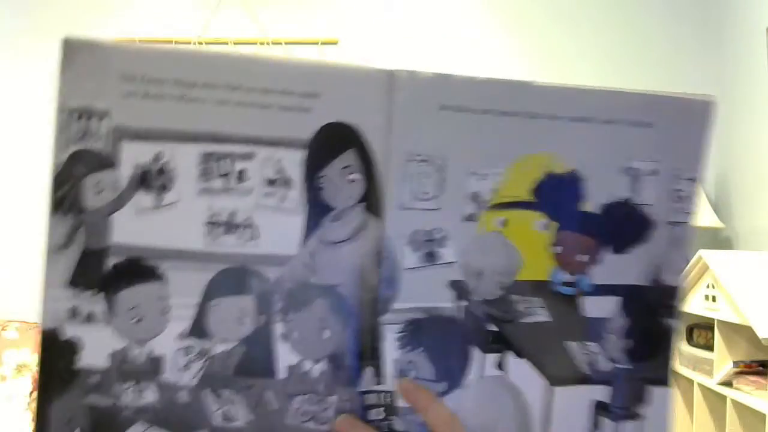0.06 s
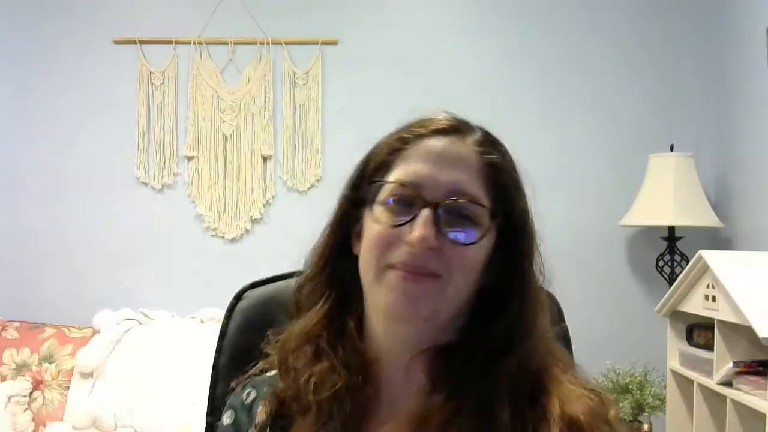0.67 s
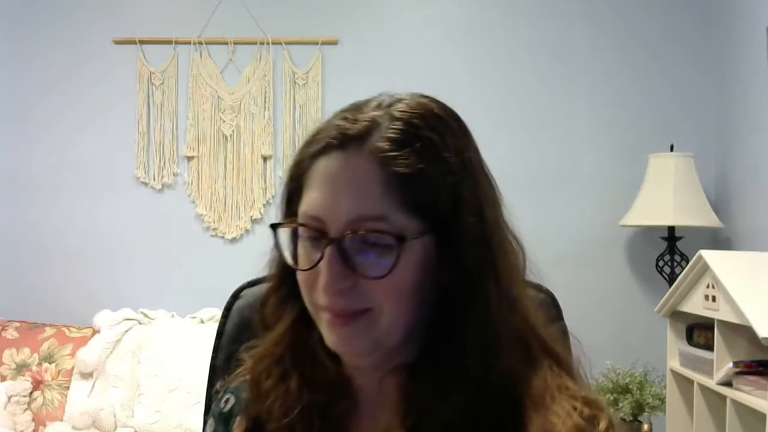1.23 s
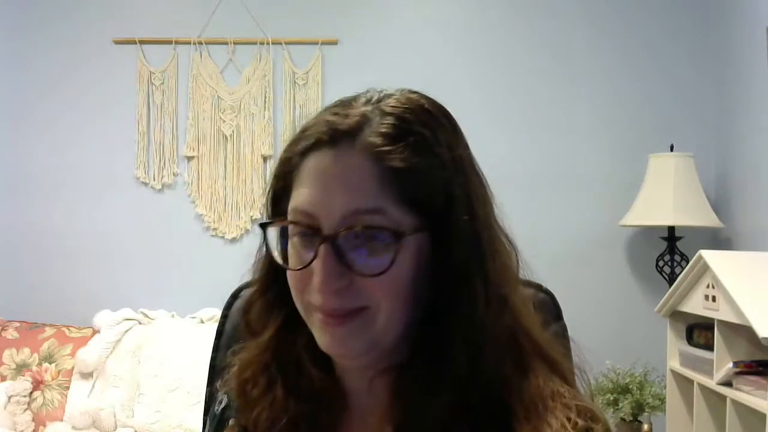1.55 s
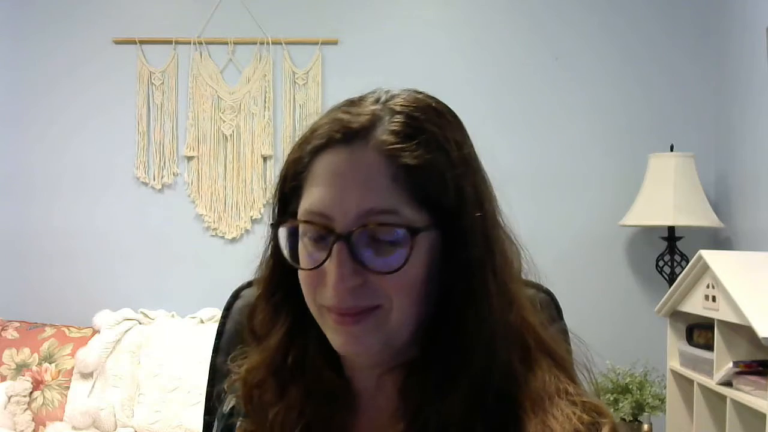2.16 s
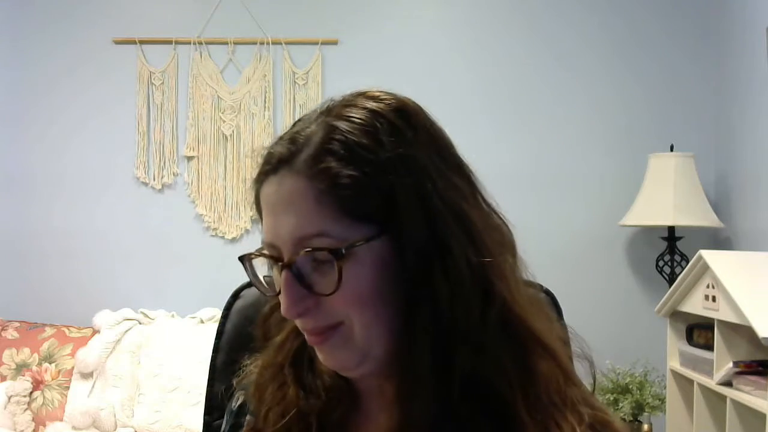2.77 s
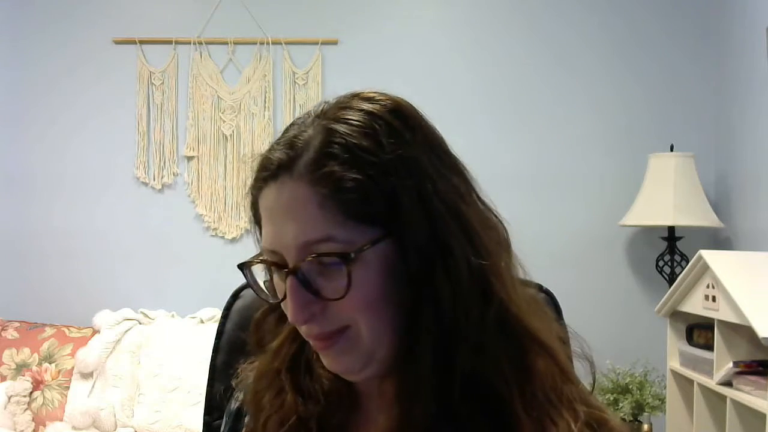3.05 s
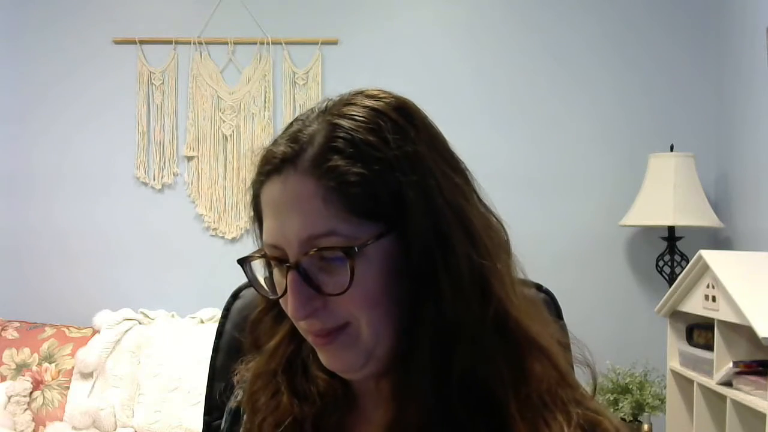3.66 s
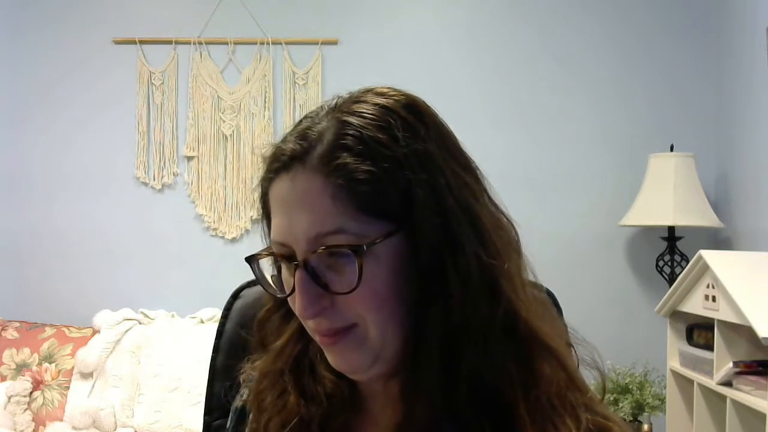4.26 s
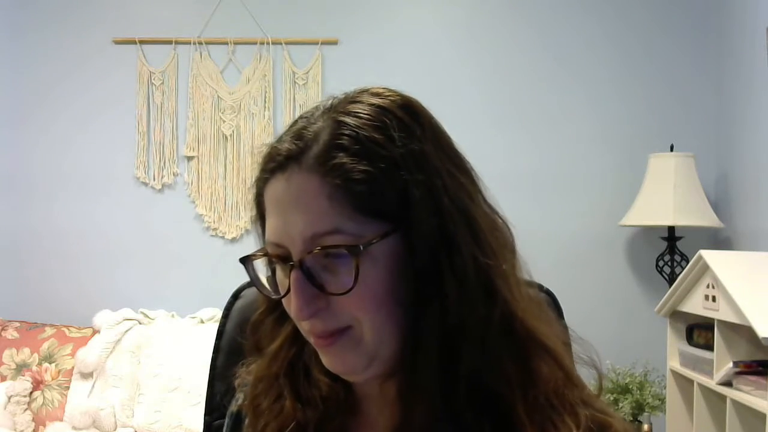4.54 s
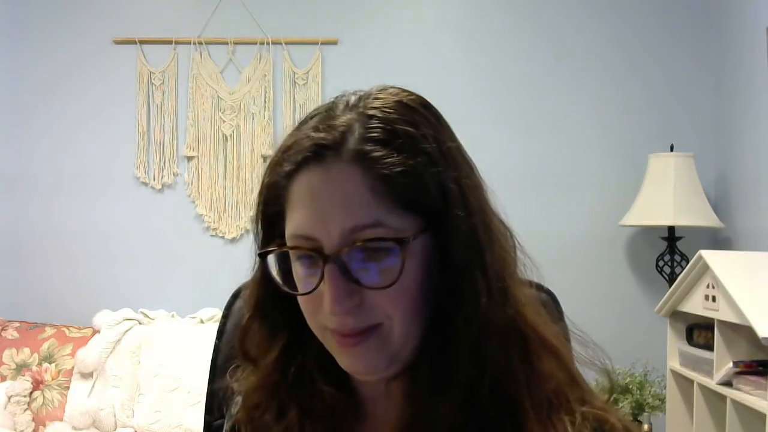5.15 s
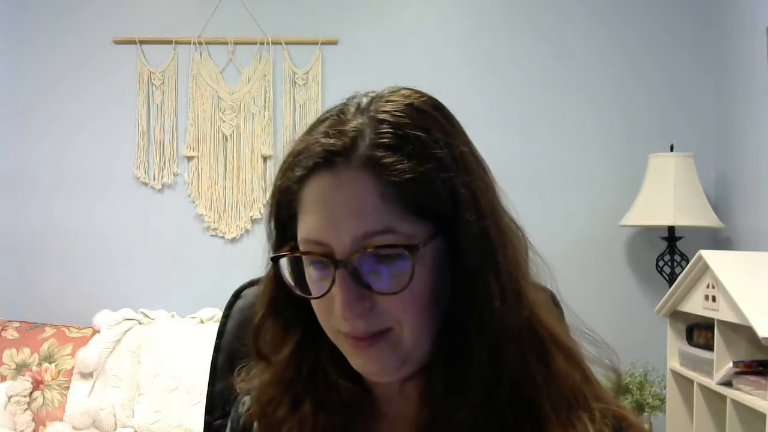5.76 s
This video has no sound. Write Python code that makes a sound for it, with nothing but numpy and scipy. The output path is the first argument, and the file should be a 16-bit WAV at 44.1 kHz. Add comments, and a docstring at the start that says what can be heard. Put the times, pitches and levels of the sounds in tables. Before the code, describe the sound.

Stiff pages of a large book are turned close by, with sliding rustles, crisp snaps and soft knocks over a faint hum.

```python
"""A large picture book is lowered and its stiff pages are turned, close to a desk microphone in a small room.
A faint hum and a fan sound throughout. In the first second and a half the book settles with soft thumps,
fingers knock on the cover and paper rustles. After a pause, sheets slide over each other in dense tiny
slips and snap as they buckle, loudest from 2.5 to 4 s, while the swinging pages push puffs of air.
Last, the pages are smoothed down amid more knocks and a few hollow taps as the grip shifts."""
import sys
import numpy as np
from scipy import signal
from scipy.fft import rfft, irfft
from scipy.io import wavfile
from scipy.ndimage import uniform_filter1d

SR = 44100
rng = np.random.default_rng(int(sys.argv[2]) if len(sys.argv) > 2 else 0)


def int16_out(signal):
    """Quantize to a 16-bit WAV file."""
    q = np.round(np.clip(np.atleast_2d(signal).T, -1, 1) * 32767)
    wavfile.write(sys.argv[1], SR, q.astype(np.int16))


N = 255542
TIME = np.arange(N) / SR


def amp(db):
    """Decibels to amplitude ratio."""
    return 10 ** (np.asarray(db) / 20)


def unit(x):
    """Normalise to an rms of one."""
    return x / np.sqrt(np.mean(x ** 2))


def with_energy(x, ms, db):
    """Energy is power times duration: give x that of a level db held for ms."""
    return x * amp(db) * np.sqrt(ms * SR / 1000 / np.sum(x ** 2))


def add(track, start_s, sound):
    """Superpose a sound on the track."""
    start = int(start_s * SR)
    track[start:start + len(sound)] += sound[:N - start]


def band(x, low_hz, high_hz):
    """Butterworth band-pass filter."""
    return signal.sosfilt(signal.butter(3, [low_hz, high_hz], "band", fs=SR, output="sos"), x)


def colour(x, spectrum, size=2048):
    """Minimum-phase filter through the given (Hz, dB) points."""
    hz, db = np.transpose(spectrum)
    grid_hz = np.maximum(np.arange(size // 2 + 1) * SR / size, 1)
    gain = amp(np.interp(np.log(grid_hz), np.log(hz), db))
    cepstrum = irfft(np.log(gain))
    cepstrum[1:size // 2] *= 2
    cepstrum[size // 2 + 1:] = 0
    impulse_response = irfft(np.exp(rfft(cepstrum)))
    return signal.fftconvolve(x, impulse_response)[:len(x)]


def moving_high_pass(x, cutoff_hz, db_per_octave=50, floor_db=-26):
    """Time-varying filter: attenuate what lies below a moving cutoff."""
    hz, t, frames = signal.stft(x, SR, nperseg=256)
    octaves_below = np.log2(np.interp(t, TIME, cutoff_hz) / np.maximum(hz, 1)[:, None])
    gain = amp(np.clip(-db_per_octave * octaves_below, floor_db, 0))
    return signal.istft(frames * gain, SR)[1][:N]


def wander(rate_hz):
    """Smooth random modulation with a spread near one."""
    hold = int(SR / rate_hz)
    steps = np.repeat(rng.standard_normal(N // hold + 1), hold)
    return uniform_filter1d(steps, hold)[:N]


def burst(ms, rise_fraction, tail_db, tail_ms, size=4096):
    """Transient excitation: a run of tiny uneven cracks with a weak exponential tail."""
    t_ms = np.arange(size) / SR * 1000
    attack = 1 - np.exp(-t_ms / (rise_fraction * ms))
    decay = np.exp(-(t_ms / ms) ** 2) + amp(tail_db) * np.exp(-t_ms / tail_ms)
    return attack * decay * rng.standard_normal(size) * amp(3 * rng.standard_normal(size))


# Partials of the hum. Each row: frequency in Hz, mean level in dB.
HUM_PARTIALS = [(119, -88.5), (240, -79), (357, -81), (472, -82.5), (585, -82.5)]
# Spectrum of the fan and room air. Each row: frequency in Hz, relative level in dB.
FAN_SPECTRUM = [(30, -30), (60, -15), (120, -3.5), (300, -8.5), (400, -0.5), (560, -0.5), (750, -6.5),
                (1000, -14.5), (1700, -21.5), (3200, -24), (6300, -22), (9000, -29), (16000, -32)]
def hum_and_fan(waver_db=3.0, fan_db=-71):
    """Tones over broadband noise: a hum, modulated in amplitude and phase, and a steady fan."""
    hum = 0
    for hz, db in HUM_PARTIALS:
        peak = np.sqrt(2) * amp(db + waver_db * wander(8.8))
        hum += peak * np.sin(2 * np.pi * hz * TIME + 0.5 * wander(20))
    fan = unit(colour(rng.standard_normal(N), FAN_SPECTRUM))
    return hum + fan * amp(fan_db + 0.61 * wander(2.6))


def room(x, wet_db=-7.5, t60_s=0.11, gap_s=0.0042):
    """Reverberation: desk and walls return a short tail, weak in the bass and the top treble."""
    t = np.arange(20000) / SR
    onset = np.clip(t / gap_s - 1, 0, 1)
    tail = rng.standard_normal(len(t)) * amp(-60 * t / t60_s) * onset
    tail = colour(tail / np.sqrt(np.sum(tail ** 2)), [(150, -6), (500, -0.5), (7000, -3), (14000, -10)])
    return x + amp(wet_db) * signal.fftconvolve(x, tail)[:N]


# Soft bumps of the book and puffs of air. Each row: start in seconds, relative level in dB, pitch in Hz.
BOOK_THUMPS = [(0.442, -53.5, 126), (.718, -46, 327), (.971, -46.5, 147), (1.043, -40, 125),
               (1.252, -35, 106), (1.303, -47, 144.3), (1.351, -40.5, 113.4), (1.381, -50, 447),
               (1.386, -50, 123), (2.53, -51, 176), (2.829, -50, 109), (3.141, -52.5, 135),
               (3.235, -55.5, 286), (3.485, -45, 134), (3.543, -48.5, 187), (3.587, -49.5, 106),
               (3.956, -48.5, 126), (4.275, -48.5, 128.1), (4.522, -38, 159), (4.561, -47.5, 175),
               (4.706, -45, 133), (5.63, -50.5, 113.7)]
def book_thumps(rise_s=0.0078, decay_s=0.015, rumble=1.4, gain_db=-3):
    """Damped oscillation: the book sways for a few cycles, with a rumble of displaced air."""
    out = np.zeros(N)
    t = np.arange(8192) / SR
    envelope = (1 - np.exp(-t / rise_s)) ** 2 * np.exp(-t / decay_s)
    for start, db, hz in BOOK_THUMPS:
        sway = np.sin(2 * np.pi * hz * t)
        air = unit(band(rng.standard_normal(len(t)), .7 * hz, 1.6 * hz))
        add(out, start, with_energy(envelope * (sway + rumble * air), ms=30, db=db + gain_db))
    return out


def resonate(force, modes):
    """Modal superposition: each mode answers the force as a damped resonator."""
    return sum(amp(db) * signal.lfilter(*signal.iirpeak(hz, hz / width, fs=SR), force)
               for hz, width, db in modes)


# Modes of the cover. Each row: frequency in Hz, bandwidth in Hz, gain in dB.
COVER_MODES = [(606, 280, 0.5), (620, 59, 1.5), (807, 128, 9), (1055, 320, 11.5), (1270, 130, 0.5),
               (1740, 84, 0), (1867, 250, -0.5), (2460, 240, -27)]
# Fingers and pages meet the cover.
# Each row: start in seconds, contact time in ms, level in dB, upper limit of the excitation in Hz.
COVER_KNOCKS = [(.711, 5, -44.5, 1500), (.722, 5.6, -36, 3600), (1.015, 12, -36.5, 1080),
                (1.034, 18, -34.5, 1260), (1.255, 6.4, -40.5, 1310), (1.314, 2.9, -32.5, 2230),
                (1.385, 6.5, -51, 895), (4.05, 12.6, -39.5, 1490), (4.117, 4.4, -42.5, 2190),
                (4.433, 9.5, -47, 2110), (4.707, 17, -37.5, 2300), (4.724, 11.7, -33, 2060),
                (5.25, 27, -48.5, 2500), (5.282, 8.1, -39.5, 2190), (5.309, 4.3, -45.5, 2400),
                (5.345, 6.9, -47, 2180), (5.627, 3.9, -41.5, 1793)]
def cover_knocks():
    """Impact excitation: the softer the contact, the lower the cover modes it reaches."""
    out = np.zeros(N)
    for start, ms, db, top_hz in COVER_KNOCKS:
        force = band(burst(ms, rise_fraction=.24, tail_db=-18, tail_ms=15), top_hz / 4, top_hz)
        add(out, start, with_energy(resonate(force, COVER_MODES), ms, db))
    return out


# Modes of a hollow tap. Each row: frequency in Hz, bandwidth in Hz, gain in dB.
HOLLOW_MODES = [(1005, 75, 2.5), (1944, 91, 1.5), (2429, 220, -13)]
# Taps of the shifting grip. Each row: start in seconds, contact time in ms, level in dB.
GRIP_TAPS = [(4.517, 4.6, -45), (4.908, 3.7, -45), (4.914, 4.6, -45), (4.926, 3, -59)]
def grip_taps():
    """Resonance: light contacts ring a few narrow modes, which sound hollow."""
    out = np.zeros(N)
    for start, ms, db in GRIP_TAPS:
        force = band(burst(ms, rise_fraction=.2, tail_db=-20, tail_ms=7), 800, 2700)
        add(out, start, with_energy(resonate(force, HOLLOW_MODES), ms, db))
    return out


# Airy sizzle of a page's edge. Each row: frequency in Hz, relative level in dB.
SIZZLE_SPECTRUM = [(5000, -27), (8500, 4.5), (10000, 8), (13000, -8), (15000, -13.5), (16500, -28)]
# A page grazes its neighbour. Each row: start in seconds, duration in ms, level in dB.
EDGE_GRAZES = [(.966, 43, -58), (1.028, 44, -47.5), (1.574, 32, -52), (3.681, 4.1, -26.5), (3.7, 30, -54),
               (4.645, 30, -65)]
def edge_grazes():
    """Friction of cut edges: they catch on each other in a run of very fine cracks."""
    out = np.zeros(N)
    for start, ms, db in EDGE_GRAZES:
        cracks = burst(ms, rise_fraction=.074, tail_db=-19.5, tail_ms=18, size=16384)
        add(out, start, with_energy(colour(cracks, SIZZLE_SPECTRUM), ms, db))
    return out


# Spectra of a snap's crack and of the sheet's body. Each row: frequency in Hz, relative level in dB.
CRACK_SPECTRUM = [(2000, -22), (3300, -10.5), (4400, -5), (5500, -2), (6500, 2.5), (7300, -3.5),
                  (8300, -11), (10000, -31), (15000, -65)]
BODY_SPECTRUM = [(40, -29.5), (110, -6.5), (350, 0.5), (800, -5), (1400, 1), (1600, 0.5), (1850, 1.5),
                 (2200, -2.5), (2600, 3), (3400, -5.5), (4600, -4), (12000, -61)]
# A buckled span rings at its lowest mode and about an octave above, and radiates little below.
# Each row: multiple of the lowest mode, gain in dB.
SPAN_RESPONSE = [(.3, -12), (.68, -15.5), (.95, 3.5), (1.1, 1), (1.4, -3.5), (2, 0.5), (2.4, -1.5)]
# A sheet buckles or its edge flicks.
# Each row: start in seconds, duration in ms, crack level in dB, body level in dB, lowest mode in Hz.
PAGE_SNAPS = [(.211, 8.1, -60, -100, 900), (0.447, 15, -54.5, -58.5, 800), (.594, 8.3, -48, -51.5, 604),
              (.656, 2.2, -47.5, -80, 2000), (.721, 10, -58.5, -43, 500), (.779, 1.54, -32, -65, 1770),
              (0.965, 7.2, -49.5, -44.5, 594), (0.976, 10.5, -39, -37.5, 560), (1.024, 50, -32, -40.5, 523),
              (1.051, 4.8, -30.5, -26.5, 545), (1.061, 1.5, -22, -31.5, 700),
              (1.119, 3.3, -39, -36.5, 1090), (1.313, 7.3, -50, -35.5, 900),
              (1.378, 5.5, -33.5, -29.5, 970), (1.577, 6.2, -34, -32, 940), (1.5912, 5.8, -25.5, -24, 965),
              (1.619, 1.3, -30, -55.5, 2010), (2.426, 14.8, -32.5, -38, 606), (2.53, 4.7, -14.5, -21, 554),
              (2.736, 18, -50.5, -65, 1300), (3.051, 11, -46, -50.5, 980), (3.061, 9.6, -41, -43.5, 830),
              (3.135, 5.2, -37.5, -45.5, 680), (3.323, 6.1, -60, -47, 890), (3.495, 0.64, -22.5, -22, 695),
              (3.585, 7.7, -45, -42.5, 590), (3.681, 6.1, -11.5, -17.5, 504), (3.959, 2.4, -15.5, -15, 575),
              (3.9762, 1.4, -23, -38, 900), (4.2659, 4.1, -22, -21.5, 630), (4.284, 8.6, -40.5, -28.5, 615),
              (4.5651, 3.3, -21, -17.5, 626), (4.708, 12.7, -46, -62, 900), (5.046, 12, -53, -90, 895),
              (5.246, 5.7, -50.5, -46.5, 800)]
def page_snaps(sizzle_offset_db=-21.5, sizzle_db_per_db=1.3):
    """Buckling releases elastic energy: a sharp crack, the sound of the whole sheet and an edge sizzle."""
    out = np.zeros(N)
    bend_hz = np.geomspace(1100, 9000, 20)
    for start, ms, crack_db, body_db, lowest_hz in PAGE_SNAPS:
        span = [(multiple * lowest_hz, db) for multiple, db in SPAN_RESPONSE]
        bend_db = 2 * rng.standard_normal(len(bend_hz))  # each bend has resonances of its own
        bend_db[0] = 0  # the slow motion of the whole sheet stays the same
        bend = np.column_stack([bend_hz, bend_db])
        sizzle_db = sizzle_offset_db + sizzle_db_per_db * crack_db
        parts = [(CRACK_SPECTRUM, ms, crack_db), (BODY_SPECTRUM, ms, body_db),
                 (SIZZLE_SPECTRUM, ms / 2, sizzle_db)]  # the sizzle dies first
        for spectrum, burst_ms, db in parts:
            cracks = burst(burst_ms, rise_fraction=.09, tail_db=-19.5, tail_ms=17)
            ringing = colour(colour(cracks, bend), span)
            add(out, start, with_energy(colour(ringing, spectrum), ms, db))
    return out


# Paper slides over paper or under a hand. Each row: start in seconds, duration in seconds,
# relative hiss level in dB, relative sheet level in dB, sheet resonance in Hz,
# swell from start to end in dB, lower cutoff of the hiss at mid-stroke in Hz.
PAGE_STROKES = [(0.44, .072, -61, -83, 2480, 5, 3300), (.588, .03, -52, -66, 1194, -9.5, 3305),
                (.65, .15, -64, -71, 1703, 4.5, 4800), (0.81, 0.055, -55.5, -53, 1439, 3, 3790),
                (0.869, 0.1, -62.5, -67.5, 1143, -11.5, 5160), (0.959, .065, -42, -44, 1592, -4, 3380),
                (1.013, 0.092, -38, -42.5, 2318, -7, 3030), (1.089, .18, -45, -48, 2699, -5, 3194),
                (1.127, .052, -59, -35.5, 3308, 7, 2986), (1.232, .18, -47.5, -46.5, 2330, .5, 2998),
                (1.348, 0.027, -43.5, -38.5, 2000, 8, 3000), (1.41, .135, -46.5, -38, 2120, -3.5, 3500),
                (1.551, .038, -45.5, -40, 2530, -1.5, 3500), (1.663, 0.49, -79.5, -90, 2820, -4, 4000),
                (2.319, .21, -48, -57, 2389, 7.5, 3575), (2.508, .085, -39.5, -47, 2705, -7, 2700),
                (2.585, .10, -50.5, -69, 3102, -8.5, 2696), (2.724, .1, -46.5, -58, 1698, 9, 3297),
                (2.905, 0.21, -49.5, -89.5, 3175, 3, 4110), (3.075, .26, -52, -59.5, 2005, -1, 3005),
                (3.253, 0.035, -59.5, -51, 3210, -4, 2990), (3.329, .085, -51.5, -69, 1690, -4, 4420),
                (3.424, .065, -48, -62.5, 1905, 19.5, 4355), (3.489, 0.38, -44.5, -57, 1900, 3.5, 3677),
                (3.668, 0.16, -37.5, -40, 2283, -17.5, 3014), (3.884, 0.076, -56.5, -55, 1196, 9, 4963),
                (3.948, 0.17, -39, -46, 1786, 1.5, 3440), (4.124, 0.097, -44.5, -78.5, 2788, 2, 5000),
                (4.18, .11, -41.5, -48.5, 1972, -0.5, 4200), (4.34, .22, -63, -66, 1409, 6, 4500),
                (4.388, 0.037, -48, -69.5, 1293, 2.5, 3612), (4.545, .09, -41.5, -43, 1904, -13, 2870),
                (4.634, 0.056, -64, -45.5, 1182, -0.5, 2916), (4.723, .085, -68.5, -59, 1002, -8.5, 4510),
                (4.801, .42, -73, -79.5, 2203, -5, 5200), (5.239, .22, -64.5, -68, 1299, -17, 4200),
                (5.443, .12, -54, -63.5, 2697, 20.5, 3830)]
def stroke_envelopes(attack_s=0.027, hiss_fall_db_per_s=482.5, sheet_fall_db_per_s=620.5, lift_octaves=.23):
    """Incoherent sources add in power: return hiss and sheet gains, power-weighted resonance and cutoff."""
    hiss_sum = sheet_sum = resonance_sum = cutoff_sum = 0
    for start, duration, hiss_db, sheet_db, resonance_hz, swell_db, cutoff_hz in PAGE_STROKES:
        t = TIME - start
        from_middle = np.clip(t / duration, 0, 1) - .5
        envelope = np.clip(t / attack_s, 0, 1) ** 2 * amp(swell_db * from_middle)
        since_end = np.clip(t - duration, 0, 1)
        hiss_power = (envelope * amp(hiss_db - hiss_fall_db_per_s * since_end)) ** 2 + 1e-18
        sheet_power = (envelope * amp(sheet_db - sheet_fall_db_per_s * since_end)) ** 2 + 1e-18
        lift = 2 ** (lift_octaves * (2 * from_middle) ** 2)  # the hiss thins at a stroke's slow ends
        hiss_sum += hiss_power
        sheet_sum += sheet_power
        cutoff_sum += hiss_power * cutoff_hz * lift
        resonance_sum += sheet_power * resonance_hz
    return np.sqrt(hiss_sum), np.sqrt(sheet_sum), resonance_sum / sheet_sum, cutoff_sum / hiss_sum


def fibre_slips(per_second=2200, scatter_db=1.5, smooth_rub=.5):
    """Stick-slip friction: fibres catch and let go in tiny uneven clicks over a smooth rub."""
    slipping = rng.random(N) < per_second / SR
    sizes = amp(scatter_db * np.minimum(rng.exponential(size=N), 5))
    clicks = unit(slipping * sizes * rng.choice([-1, 1], N))
    return unit(clicks + smooth_rub * rng.standard_normal(N))


def sliding_pages(octaves_below=.78, octaves_above=.86, pressure_db=1.3, flutter_db=2.0, patchy_db=3.5):
    """Forced vibration: slips hiss at the surface and shake the sheet, whose resonance moves as it bends."""
    hiss_gain, sheet_gain, resonance_hz, cutoff_hz = stroke_envelopes()
    resonance_hz *= 2 ** (.15 * wander(22))
    pressing_db = pressure_db * wander(26)
    friction = fibre_slips() * amp(pressing_db + flutter_db * wander(170))
    band_edges = np.geomspace(300, 7600, 15)
    sheet = power = 0
    for low, high in zip(band_edges, band_edges[1:]):
        octaves_off = np.log2(np.sqrt(low * high) / resonance_hz)
        width = np.where(octaves_off < 0, octaves_below, octaves_above)
        weight = np.exp(-.5 * (octaves_off / width) ** 2)
        sheet += unit(band(friction, low, high)) * weight * amp(patchy_db * wander(27))
        power += weight ** 2
    sheet = unit(sheet / np.sqrt(power))
    return surface_hiss(friction, cutoff_hz) * hiss_gain * amp(-0.5) + sheet * sheet_gain * amp(-1)


# Hiss of rubbed paper. Each row: frequency in Hz, relative level in dB.
HISS_SPECTRUM = [(1500, -12), (3000, -2.5), (3800, -4), (5200, 1.5), (6300, 4.5), (7200, 2.5), (8200, -9),
                 (10000, -24.5), (12500, -44), (16000, -60)]
def surface_hiss(friction, cutoff_hz):
    """Friction noise: the paper's surface radiates a treble band with a moving lower edge."""
    return unit(moving_high_pass(colour(friction, HISS_SPECTRUM), cutoff_hz))


def scene():
    """Superposition: the book and its reverberation over the hum and fan, in one channel."""
    book = sliding_pages() + page_snaps() + edge_grazes() + cover_knocks() + grip_taps() + book_thumps()
    return (room(book) + hum_and_fan())[None]


def record(dry, low_cut_hz=72, ceiling=.85, high_cut_hz=16000):
    """Band limiting and overload: the microphone drops deep bass, clips extreme peaks and cuts the top."""
    low_cut = signal.butter(3, low_cut_hz, "high", fs=SR, output="sos")
    high_cut = signal.ellip(8, .2, 70, high_cut_hz, fs=SR, output="sos")
    clipped = np.clip(signal.sosfilt(low_cut, dry), -ceiling, ceiling)
    return signal.sosfilt(high_cut, clipped)


dry = scene()
out = record(dry)
int16_out(out)
```